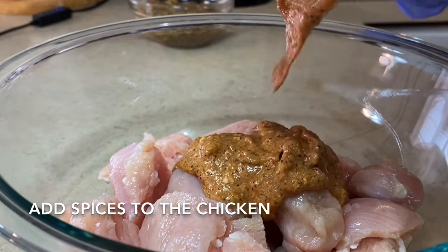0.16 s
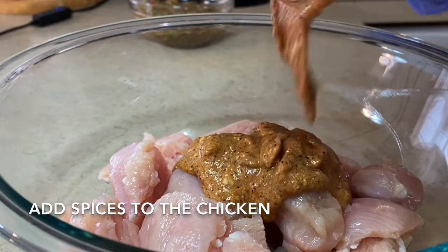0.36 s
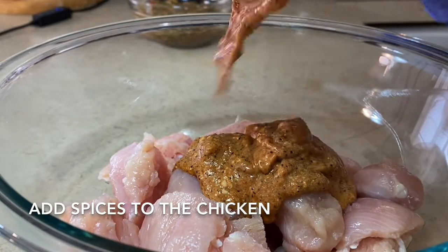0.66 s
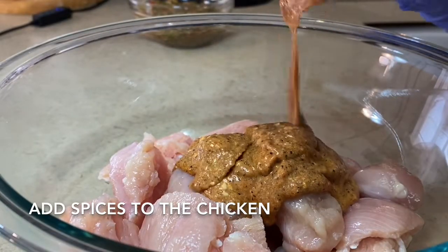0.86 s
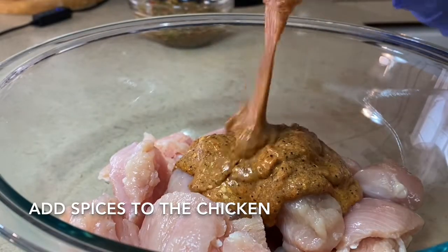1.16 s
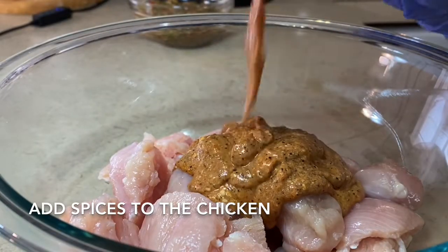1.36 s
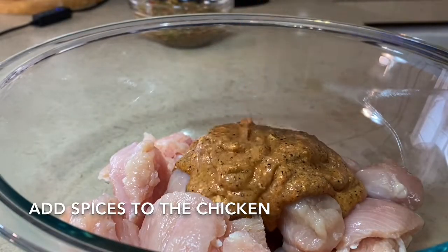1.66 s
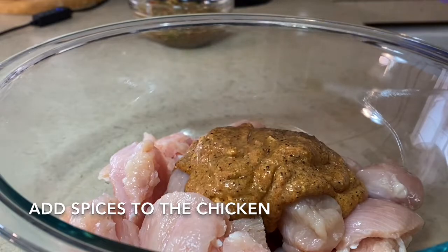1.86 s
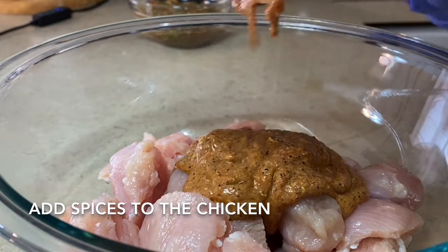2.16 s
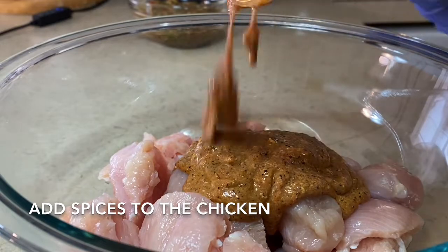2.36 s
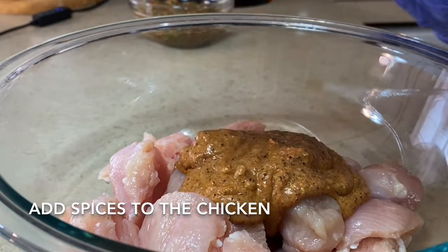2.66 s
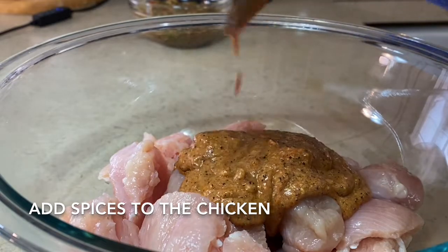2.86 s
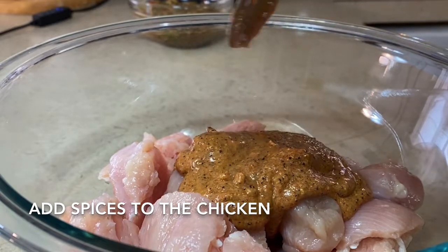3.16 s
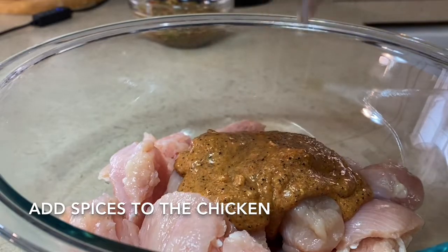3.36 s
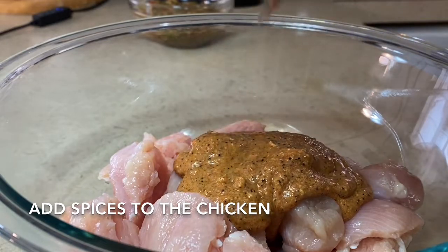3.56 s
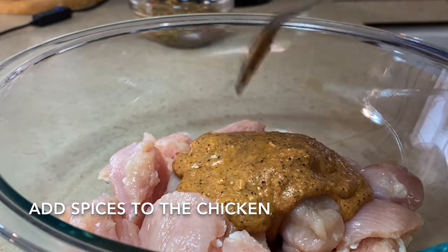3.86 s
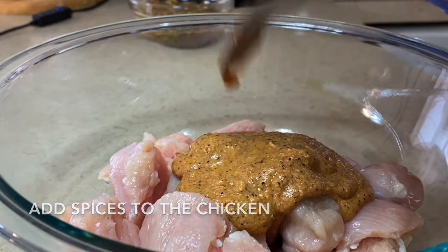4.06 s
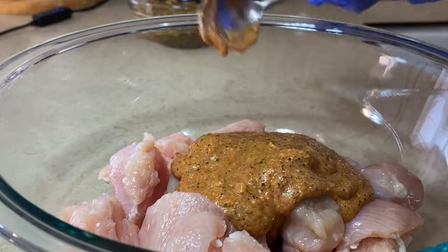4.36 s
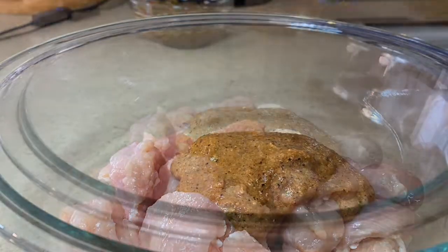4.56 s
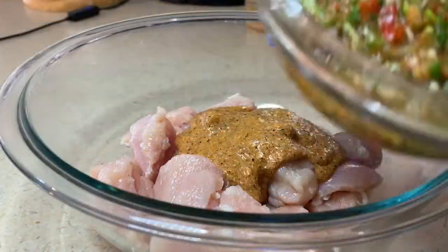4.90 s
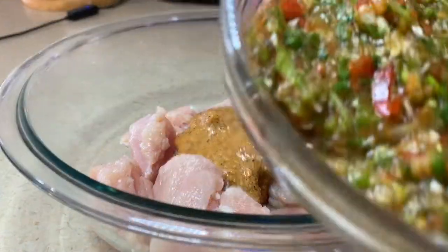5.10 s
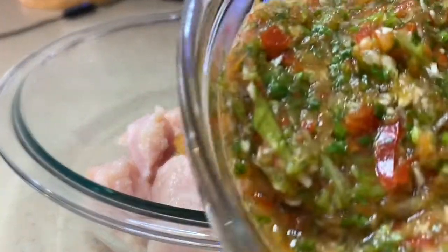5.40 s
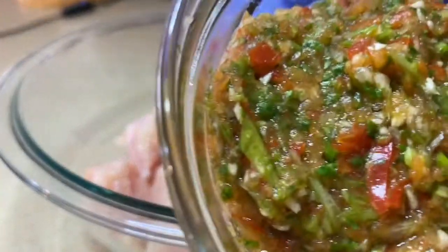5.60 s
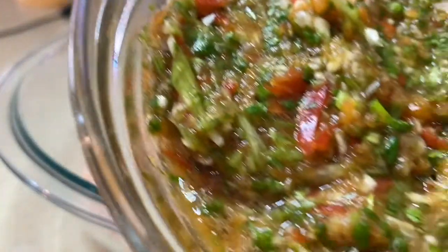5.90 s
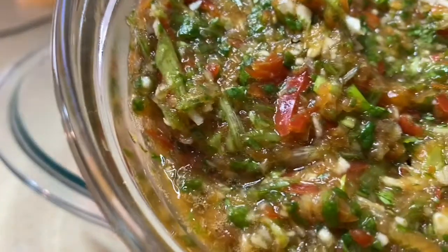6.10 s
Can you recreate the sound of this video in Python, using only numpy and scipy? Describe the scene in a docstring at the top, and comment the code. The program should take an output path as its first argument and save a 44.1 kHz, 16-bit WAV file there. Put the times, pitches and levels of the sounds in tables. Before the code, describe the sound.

Bright, irregular spoon taps ring on a small glass cup above a low kitchen fan, fading out before a heavier bowl knocks another bowl.

```python
"""Ringing taps come first: a steel spoon knocks paste loose on a small glass cup held close, over a fan's drone.
Faint puffs of treble hiss run among and after the taps, and a soft thud lies under one tap; late on, a full
glass bowl bumps the rim of a large one, with two soft thuds. Blows are sums of decaying modes plus a noise crack,
answered by a hard kitchen; thuds are single damped pushes. Drone and puffs are coloured stereo noise, the drone
with two faint tones; gain control ducks the loudest blows."""
import sys
import numpy as np
from scipy import signal
from scipy.fft import rfft, irfft, next_fast_len
from scipy.io import wavfile
from scipy.ndimage import uniform_filter1d, minimum_filter1d

SR = 44100
rng = np.random.default_rng(int(sys.argv[2]) if len(sys.argv) > 2 else 0)


def int16_out(signal):
    """Quantize to a 16-bit WAV file."""
    q = np.round(np.clip(np.atleast_2d(signal).T, -1, 1) * 32767)
    wavfile.write(sys.argv[1], SR, q.astype(np.int16))


N = 275184
LEAD_IN = SR // 8  # samples kept before time zero

# All levels are relative.
# Spoon on cup: [t/s, crack level/dB, spoon ring level/dB, spoon overtone level/dB, cup low level/dB,
# cup wall level/dB, cup middle level/dB, cup high level/dB, left-right level/dB, T60 while touching/s]
SPOON_TAPS = [(-.04, -20, -14, -22, -53, -30.5, -46, -40, 4, .031),
              (.231, -13.5, -7.5, -12.5, -37, -30.5, -42.5, -28, 0, 0.019),
              (.4802, -15, -12.5, -19, -52, -37.5, -44, -38, 2, 0.019),
              (.5716, -10, -16.5, -19.5, -19.5, -19, -26, -28, 3, 0.028),
              (1.1157, -8.5, -12, -20.5, -18.5, -30, -23.5, -19, 2.5, 0.023),
              (1.328, -45.5, -54, -63, -51.5, -55, -35.5, -48, 0, 0.029),
              (1.518, -51, -72, -64.5, -63, -66, -64.5, -64, 4, 0.02),
              (1.608, -17, -14.5, -16.5, -42, -41.5, -40, -32, 0, 0.024),
              (1.7224, -9.5, -38.5, -35.5, -18.5, -19, -10.5, -23.5, 5, 0.091),
              (2.348, -36, -61.5, -59.5, -51, -56, -51.5, -49, 3, 0.017),
              (2.419, -18.5, -36.5, -38.5, -15, -32, -6, -19, 7, 0.062),
              (2.558, -45, -59.5, -58.5, -62, -44.5, -46.5, -50, 3.5, .021),
              (2.578, -35, -56, -60, -63, -43, -56.5, -57, 3, 0.019),
              (2.6023, -17.5, -35, -31, -41, -35.5, -16, -23, 7, 0.043),
              (3.0355, -20, -39, -33, -22, -33.5, -26.5, -25.5, 5, 0.035),
              (3.221, -47, -62, -65.5, -64.5, -64, -42.5, -51.5, 6.5, .052),
              (3.244, -55, -63, -60, -65, -70, -52, -60, 5.5, .027),
              (3.68, -73.5, -78.5, -81, -80, -80.5, -63, -75, -0.5, .052)]
# Pitch of the spoon's main ring, higher as paste drops off: [t/s, f/Hz]
SPOON_RING_PITCH = [(0, 5610), (.23, 5622), (.48, 5783), (1.12, 5780), (1.61, 5838)]
# Spoon overtones of fixed pitch: [f/Hz, level/dB, T60/s]
SPOON_OVERTONES = [(1060, -10.5, 0.27), (1370, -12, 0.047), (2440, -11, .1), (4140, -8, 0.1),
                   (5188, -10.5, 0.13), (7000, -14.5, .1), (9430, 1.5, 0.11), (10840, -8.5, 0.078),
                   (13100, -5.5, .08)]
# Low, wall and middle modes of the cup: [f/Hz before the hand shifts, f/Hz after, T60/s]
GRIPPED_CUP_MODES = [(1735, 1793, .42), (3412, 3245, 0.07), (4430, 4385, 0.13)]
# High cup modes of fixed pitch: [f/Hz, level/dB, T60/s]
HIGH_CUP_MODES = [(7710, -0.5, 0.062), (10220, -10.5, 0.073), (11850, -15.5, 0.054), (14800, -12.5, .08)]
# Weaker neighbours of the spoon ring and the cup middle: [pitch ratio, level/dB, T60/s]
TWIN_MODES = [(0.979, -10.5, 0.18), (1.04, -11.5, .07)]
# Colour of every crack, with dips near 8.7 kHz and 12.2 kHz: [f/Hz, level/dB]
CRACK_COLOUR = [(300, -16), (900, -6.5), (2400, 2), (7500, -2), (8700, -10), (9800, 1), (11000, -2),
                (12200, -8.5), (13800, 5), (16000, -12.5)]
# Reflections from near walls and counter: [delay/s, level/dB]
EARLY_REFLECTIONS = [(.0062, -20.5), (.011, -18.5), (0.018, -20.5), (.022, -19)]
# Decay of the kitchen: [f/Hz, T60/s]
KITCHEN_DECAY = [(150, 0.3), (1000, 0.49), (2500, 0.42), (4000, .45), (7000, 0.39), (14500, 0.28),
                 (16200, .1)]
# Spectral density of the fan noise: [f/Hz, level/dB per Hz]
DRONE_COLOUR = [(20, -18.5), (40, -18.5), (75, -9), (120, -11), (187, -3), (388, -4.5), (607, -15.5),
                (873, -23), (1290, -22), (2530, -44.5), (5680, -49.5), (8410, -57), (9950, -53.5),
                (12100, -63), (13500, -58), (16000, -76)]
# Course of the fan noise: [t/s, level/dB]
DRONE_LEVEL = [(0, -50), (.6, -50), (1.2, -50.5), (1.9, -49.5), (3, -49.5), (4.3, -50.5), (4.7, -53),
               (5.25, -49.5), (6.24, -50)]
# Room modes that lift the fan noise: [f/Hz, width/Hz, lift level/dB]
ROOM_MODES = [(162, 25, 6), (192, 9.2, 8), (270, 23, 6.5), (345, 16, 4), (402, 18, 4), (466, 14, 4.5),
              (532, 23, 6)]
# Steady faint tones: [f/Hz, peak level/dB on the left]
WHINE_TONES = [(1888, -90.5), (5600, -96)]
# Left-right correlation of the fan noise: [f/Hz, correlation]
DRONE_CORRELATION = [(60, 0.35), (180, 0.75), (550, 0.14), (1650, 0.099), (4970, 0.1), (15000, 0.15)]
# Puffs of treble hiss: [t/s, peak level/dB]
HISS_PUFFS = [(0.928, -66.5), (1.053, -60), (1.291, -69), (1.411, -70.5), (1.529, -78), (2.064, -64),
              (2.167, -66), (2.37, -59.5), (2.83, -63.5), (3.328, -69.5), (3.362, -60.5), (3.477, -68.5),
              (3.7, -71), (3.806, -70.5), (3.936, -67.5), (4.051, -69), (4.156, -68.5), (4.293, -66.5),
              (4.556, -70), (4.652, -69), (5.005, -62.5), (5.303, -64), (5.605, -63.5), (5.873, -64),
              (5.92, -65.5), (6.144, -65.5)]
# Spectral density of the hiss: [f/Hz, level/dB per Hz]
HISS_COLOUR = [(1200, -28.5), (2000, -0.5), (3500, -0.5), (5870, 1.5), (8580, -5.5), (10200, 1.5),
               (12100, -13.5), (13000, -3), (14200, -3.5), (15400, -13.5), (16100, -39.5)]
# Soft pushes through the counter: [t/s, level/dB, width/s]
COUNTER_PUSHES = [(5.0795, -8.5, .0022), (5.088, -19.5, 0.0049), (1.726, -37, 0.0036)]
# Bowl on bowl: [t/s, crack level/dB, crack tilt/(dB/octave), left-right level/dB]
BOWL_BUMP = (5.0712, -29, -9.5, 1.5)
# Modes of the large bowl: [f/Hz, level/dB, T60/s]
LARGE_BOWL_MODES = [(257, -16, .1), (514.7, -33, 0.45), (598, -24, .05), (700, -19.5, .05),
                    (852, -10, .035), (992, -14.5, 0.046), (1110, -14.5, .04), (1390.4, -17, .36),
                    (1394.2, -24, .68), (1770, -17.5, .05), (2008, -14.5, 0.044), (2580, -10.5, .15),
                    (2662, -21.5, 0.092), (4000, -33, .18), (5640, -27, 0.16), (7670, -42.5, .15),
                    (8000, -33.5, 0.057), (9540, -38, .12), (10660, -35, .12), (13290, -35, 0.09),
                    (15140, -36, .12)]

SPOON_RING_T60_S = 0.27
TAP_TILT_DB_PER_OCTAVE = -1.23  # slope of the tap's crack, added to its colour
REGRIP_S = 1.2  # the hand shifts on the cup and retunes its gripped modes
PORT_LEAD_S = 2.1e-5  # the left port hears near sources sooner by this much
PUFF_T60_S, PUFF_RISE_S = 0.35, 0.011
DRONE_PAN_DB = -2  # left minus right
TOP_HZ = 16700  # band limit


def amp(db):
    """Level definition: 20 dB is a factor of ten in amplitude."""
    return np.exp(np.asarray(db) * np.log(10) / 20)


def unit(x):
    """Normalization: scale to a root mean square of one."""
    return x / np.sqrt(np.mean(x ** 2) + 1e-20)


def along(points, hz):
    """Logarithmic frequency scale: interpolate (f/Hz, value) points on it."""
    f, v = np.transpose(points)
    return np.interp(np.log(hz + 1), np.log(f + 1), v)


def filtered(x, response):
    """Linear filtering: multiply the spectrum by a complex response of frequency."""
    n = x.shape[-1]
    padded = next_fast_len(n + 4096)
    hz = np.fft.rfftfreq(padded, 1 / SR)
    return irfft(rfft(x, padded) * response(hz), padded)[..., :n]


def blank_track():
    """Superposition starts from silence, in stereo with the lead-in."""
    return np.zeros((2, N + LEAD_IN))


def add(track, s, sound):
    """Superposition: add a sound at s seconds."""
    part = track[:, LEAD_IN + round(s * SR):][:, :sound.shape[-1]]
    part += sound[..., :part.shape[1]]


def kitchen(x, wet_db, alike):
    """Reverberation: convolve with a noise tail in which each frequency decays at its own rate."""
    hz, t, z = signal.stft(rng.standard_normal((2, SR // 2)), SR, nperseg=256)
    decay_db = -60 * t / along(KITCHEN_DECAY, hz)[:, None]
    dulling_db = -0.3 * hz[:, None] / 1000
    a, b = signal.istft(z * amp(decay_db + dulling_db), SR, nperseg=256)[1]
    turn = np.arccos(np.clip(alike, 0, 1)) / 2  # the angle between the channels sets their correlation
    mid, side = np.cos(turn) * a, np.sin(turn) * b
    tail = np.array([mid + side, mid - side])
    tail *= 1 - np.exp(-np.arange(tail.shape[1]) / (.004 * SR))  # the first walls are a metre or two away
    tail /= np.linalg.norm(tail[0])
    return amp(wet_db) * signal.fftconvolve(x[None], tail, axes=1)[:, :len(x)]


def at_ports(near):
    """Time difference and image sources: the left port leads, and early echoes follow."""
    def response(hz):
        lead = np.exp(1j * np.pi * hz * PORT_LEAD_S * np.array([[1], [-1]]))
        paths = 1
        for delay, db in EARLY_REFLECTIONS:
            delays = delay + rng.normal(0, .0004, (2, 1))
            paths = paths + amp(db) * np.exp(-2j * np.pi * hz * delays)
        return lead * paths
    return filtered(near, response)


def blow(modes, crack_db, tilt_db, pan_db, wet_db, free_db, touch_t60, crack_t60, rough, spread, size):
    """Modal superposition: modes damped fast by contact, then free, with a short noise crack."""
    t = np.arange(size) / SR
    hz, db, t60 = np.transpose(modes)[:, :, None]
    # wet paste blurs each pitch
    drift = np.cumsum(rng.standard_normal((len(modes), size)), axis=1) * rough * hz / 4000
    fade = amp(-60 * t / touch_t60) + amp(free_db - 60 * t / t60)
    chance = rng.standard_normal((2, len(modes), 1))
    # each mode faces the two ports differently
    skew = spread * np.sign(chance[0]) * np.array([1, -1])[:, None, None]
    vibration = np.sin(2 * np.pi * hz * t + drift + skew)
    ring = np.sum(amp(db + 0.99 * chance[1]) * fade * vibration, axis=1)

    crack = amp(crack_db - 60 * t / crack_t60) * rng.standard_normal(size)
    crack = filtered(crack, lambda f: amp(tilt_db * np.log2((f + 300) / 4000) + along(CRACK_COLOUR, f)))
    near = (ring + crack) * (1 - np.exp(-t / 0.00066))
    far = near.mean(axis=0) + 0.38 * crack  # the crack spreads to all sides, the modes in lobes
    pan = np.array([[pan_db], [-pan_db]])
    return amp(pan / 2) * at_ports(near) + amp(pan / 4) * kitchen(far, wet_db, alike=.4)


def spoon_taps():
    """Modal excitation: each tap sets its own levels for the groups of spoon and cup modes."""
    track = blank_track()
    for s, crack_db, ring_db, over_db, low_db, wall_db, mid_db, high_db, pan_db, touch_t60 in SPOON_TAPS:
        ring = (np.interp(s, *np.transpose(SPOON_RING_PITCH)), ring_db, SPOON_RING_T60_S)
        gripped = []
        for (before, after, t60), db in zip(GRIPPED_CUP_MODES, [low_db, wall_db, mid_db]):
            gripped.append((after if s > REGRIP_S else before, db, t60))
        twins = []
        for (hz, db, _), (ratio, less_db, t60) in zip([ring, gripped[-1]], TWIN_MODES):
            twins.append((hz * ratio, db + less_db, t60))
        overtones = [(hz, db + over_db, t60) for hz, db, t60 in SPOON_OVERTONES]
        high = [(hz, db + high_db, t60) for hz, db, t60 in HIGH_CUP_MODES]
        add(track, s, blow([ring] + gripped + twins + overtones + high, crack_db, TAP_TILT_DB_PER_OCTAVE,
                           pan_db, wet_db=-12.5, free_db=-18.5, touch_t60=touch_t60, crack_t60=.011,
                           rough=0.056, spread=0.37, size=SR // 2))
    return track[:, LEAD_IN:]


def rush(level_db, alike, patchy_db):
    """Partial coherence: mid and side noise of random patches, scaled to a stereo rms of one."""
    z = signal.stft(rng.standard_normal((2, N)), nperseg=512)[2]
    field = uniform_filter1d(rng.standard_normal(z.shape[1:]), size=6, axis=0)  # across frequency
    field = uniform_filter1d(field, size=10, axis=1)  # across time
    pair = signal.istft(z * amp(patchy_db * unit(field)), nperseg=512)[1][:, :N]

    def response(hz):
        turn = np.arccos(np.clip(along(alike, hz), -1, 1)) / 2
        return amp(level_db(hz)) * np.array([np.cos(turn), np.sin(turn)])
    mid, side = filtered(pair, response)
    return unit(np.array([mid + side, mid - side]))


def fan_drone():
    """Room resonance: broadband fan noise lifted at low room modes, with two thin tones."""
    t = np.arange(N) / SR

    def colour(hz):
        lift_db = sum(db / (1 + (2 * (hz - centre) / width) ** 2) for centre, width, db in ROOM_MODES)
        return along(DRONE_COLOUR, hz) + lift_db
    level_db = np.interp(t, *np.transpose(DRONE_LEVEL))
    pan_db = np.array([[DRONE_PAN_DB / 2], [-DRONE_PAN_DB / 2]])
    noise = amp(level_db + pan_db) * rush(colour, DRONE_CORRELATION, patchy_db=0.8)
    tones = sum(amp(db) * np.sin(2 * np.pi * hz * t) for hz, db in WHINE_TONES)
    return noise + tones * np.array([[1], [-.4]])  # right side weaker and inverted


def hiss_puffs():
    """Addition of powers: treble noise rises within milliseconds and dies away, faster at the end."""
    t = np.arange(N) / SR
    power = np.zeros(N)
    for s, db in HISS_PUFFS:
        fall_db = 60 * (np.abs(t - s) / PUFF_T60_S) ** 1.1
        rise = np.clip(1 + (t - s) / PUFF_RISE_S, 0, 1)
        power += amp(db - fall_db) ** 2 * rise
    return np.sqrt(power) * rush(lambda hz: along(HISS_COLOUR, hz), [(3000, 0.26)], patchy_db=3.5)


def counter_thuds():
    """Damped oscillation: a soft push through the counter is a fast-dying sine."""
    track = blank_track()
    for s, db, width in COUNTER_PUSHES:
        u = np.arange(SR // 2) / SR / width
        push = -amp(db) * np.sin(np.pi * u) * np.exp(-u / 1.3)
        add(track, s, push + kitchen(push, wet_db=-4, alike=.92))
    return track[:, LEAD_IN:]


def bowl_bump():
    """Modal excitation: bowl meets bowl, and the large bowl's modes ring on freely."""
    track = blank_track()
    s, crack_db, tilt_db, pan_db = BOWL_BUMP
    add(track, s, blow(LARGE_BOWL_MODES, crack_db, tilt_db, pan_db, wet_db=-12, free_db=0, touch_t60=.012,
                       crack_t60=.1, rough=0.0033, spread=0.5, size=SR))
    return track[:, LEAD_IN:]


def scene():
    """Superposition: the pressures of all sources add."""
    return spoon_taps() + fan_drone() + hiss_puffs() + counter_thuds() + bowl_bump()


def record(dry):
    """Dynamic compression and saturation: loud blows duck the gain, peaks round off, the band is limited."""
    level_db = 10 * np.log10(np.abs(uniform_filter1d(np.max(dry ** 2, axis=0), size=400)) + 1e-12)
    need_db = -1.2 * np.clip(level_db + 14, 0, None)
    hold = int(.12 * SR)
    held_db = minimum_filter1d(need_db, hold, origin=(hold - 1) // 2)  # looks back over the hold time
    pole = np.exp(-1 / (0.057 * SR))  # 57 ms time constant, down and up
    gain_db = signal.lfilter([1 - pole], [1, -pole], held_db)
    ducked = dry * amp(gain_db)
    rounded = ducked / (1 + np.abs(ducked / .95) ** 6) ** (1 / 6)
    # deepest bass rolled off, nothing above the band limit
    return filtered(rounded, lambda hz: (hz < TOP_HZ) * hz ** 4 / (hz ** 4 + 42 ** 4))


dry = scene()
out = record(dry)
int16_out(out)
```